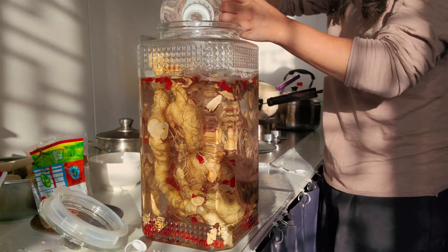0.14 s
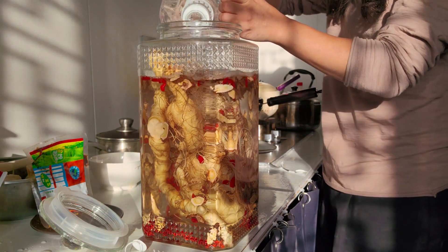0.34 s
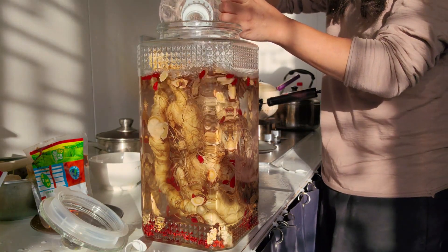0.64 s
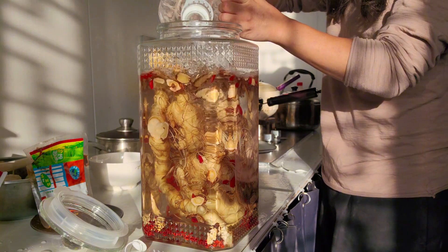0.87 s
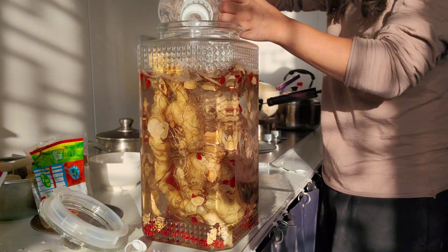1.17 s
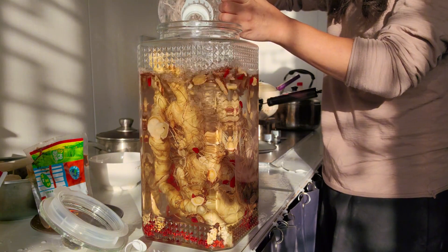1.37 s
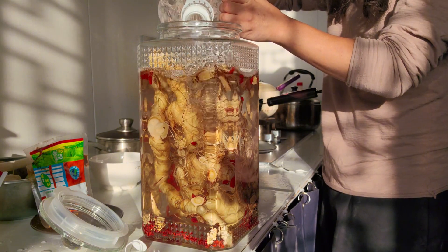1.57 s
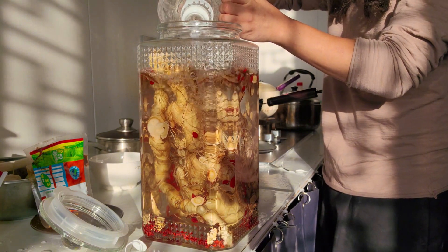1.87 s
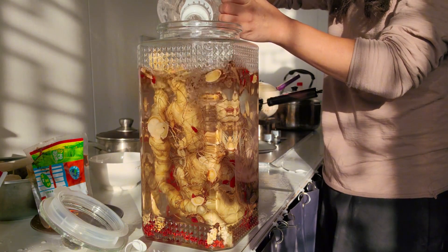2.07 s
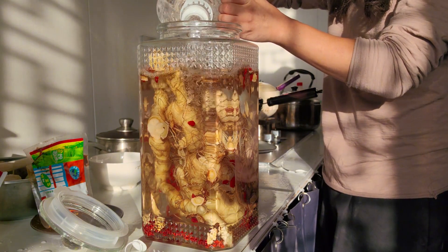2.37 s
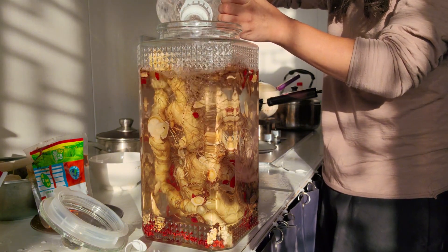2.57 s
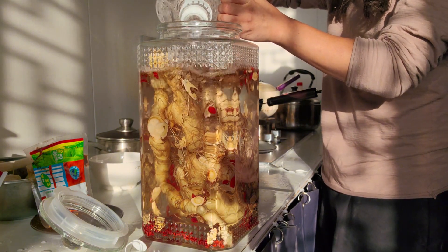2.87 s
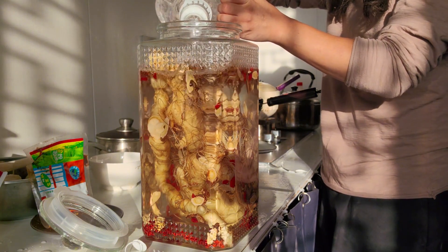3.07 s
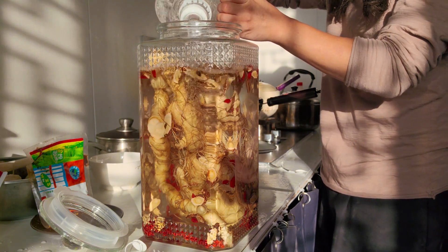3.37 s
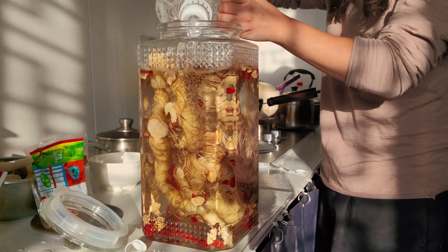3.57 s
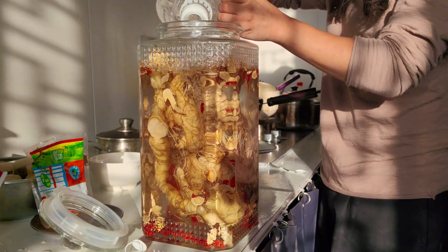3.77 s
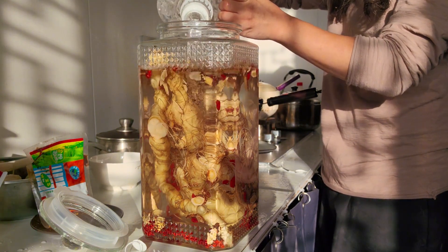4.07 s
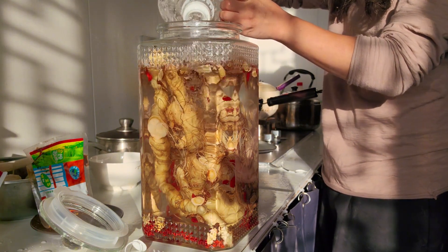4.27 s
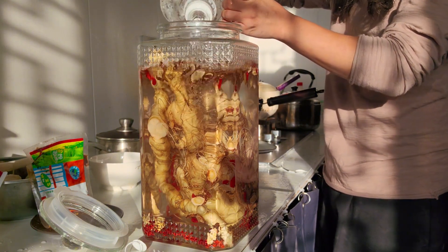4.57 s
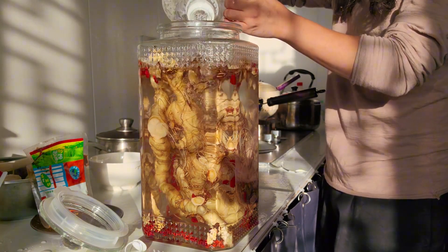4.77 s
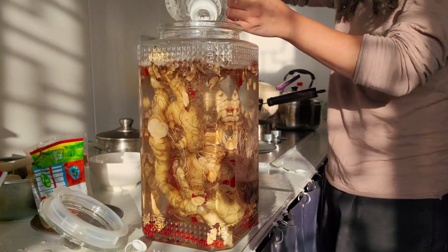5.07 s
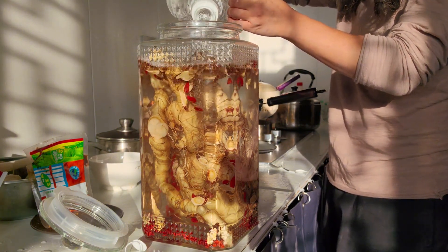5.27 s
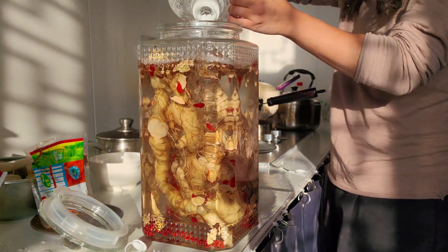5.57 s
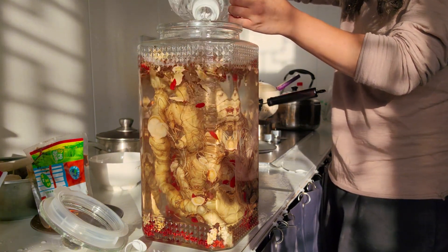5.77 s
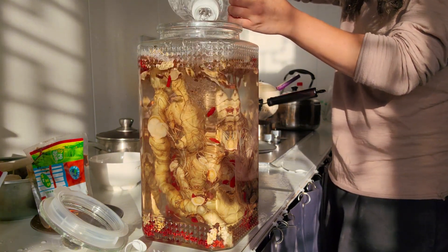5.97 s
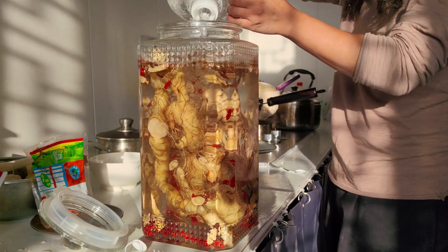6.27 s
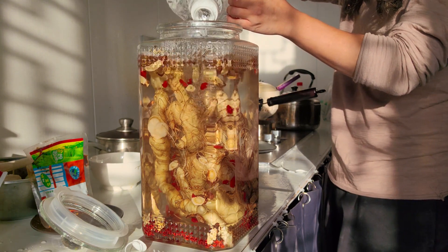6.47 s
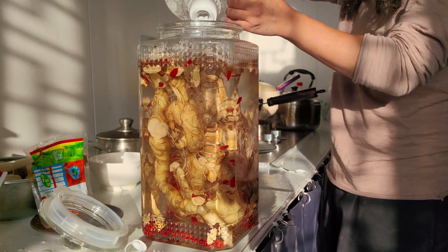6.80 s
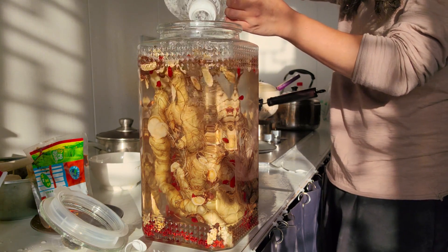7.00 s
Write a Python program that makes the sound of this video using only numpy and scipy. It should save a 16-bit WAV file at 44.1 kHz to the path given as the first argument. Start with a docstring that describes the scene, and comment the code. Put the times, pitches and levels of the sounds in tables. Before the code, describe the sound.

Liquid glugs from an upturned plastic jug into a nearly full glass jar, deep uneven gulps with fizzing splashes in a hard-walled kitchen.

```python
"""Deep liquid glugs: a plastic jug is upturned into a tall, nearly full glass jar in a hard-walled kitchen.
The stream arrives in surges, about four a second; air pockets large and small gulp as sliding sines.
Swarms of tiny damped sines make gurgle, fizz and spray; short noise bursts make slaps, spatters, low sloshes.
The air above the liquid, noise in narrow bands, rings a little higher as the jar fills.
A stereo microphone pair hears it with the room's echoes, over a quiet background of shaped noise."""
import sys
import numpy as np
from scipy import signal
from scipy.fft import rfft, irfft, next_fast_len
from scipy.io import wavfile
from scipy.ndimage import uniform_filter1d, map_coordinates

SR = 44100
rng = np.random.default_rng(int(sys.argv[2]) if len(sys.argv) > 2 else 0)


def bounce(signal):
    """Save signal as a 16-bit WAV file at the path given by the first command-line argument."""
    frames = np.transpose(np.atleast_2d(signal))
    limited = np.clip(frames, -1, 1)
    pcm = np.round(limited * 32767).astype(np.int16)
    wavfile.write(sys.argv[1], SR, pcm)


N = 314874  # length in samples


def amp(db):
    """Decibels to gain."""
    return 10 ** (np.asarray(db) / 20)


def unit(x):
    """Scale to rms 1."""
    return x / np.sqrt(np.mean(x ** 2) + 1e-20)


def along(points, hz):
    """Read (Hz, value) points on a log frequency axis."""
    f, value = np.transpose(points)
    return np.interp(np.log(hz + 1), np.log(f + 1), value)


def at_time(points, s):
    """Read (seconds, value) points at time s."""
    return np.interp(s, *np.transpose(points))


def wobble(rate):
    """A smooth random curve, rate knots a second."""
    knots = rng.standard_normal(int(N * rate / SR) + 4)
    return map_coordinates(knots, [np.arange(N) * rate / SR])


def filtered(x, response):
    """Shape x by a response given as a function of frequency."""
    n = x.shape[-1]
    m = next_fast_len(n + 8192)
    return irfft(rfft(x, m) * response(np.fft.rfftfreq(m, 1 / SR)), m)[..., :n]


def add(track, s, sound):
    """Mix a sound into the track at time s."""
    start = max(round(s * SR), 0)
    part = sound[..., :max(N - start, 0)]
    track[..., start:start + part.shape[-1]] += part


# How alike the two microphones hear diffuse sound.
# Each row: frequency in Hz, left-right correlation (no unit).
LEFT_RIGHT_LIKENESS = [(60, 0.8), (450, 0.76), (1200, 0.27), (2500, 0.37), (5000, -0.024), (9000, 0.52),
                       (15000, -0.01)]


def spread(pair):
    """Turn two unrelated signals into left and right: alike in the bass, more diffuse higher up."""
    def mid_and_side(hz):
        turn = np.arccos(np.clip(along(LEFT_RIGHT_LIKENESS, hz), -1, 1)) / 2
        return np.array([np.cos(turn), np.sin(turn)])
    mid, side = filtered(pair, mid_and_side)
    return np.array([mid + side, mid - side])


def coloured(pair, spectrum):
    """Stereo sound of rms 1, its sources weighted by the given spectrum."""
    return unit(spread(filtered(pair, lambda hz: amp(along(spectrum, hz)))))


# Tone of the kitchen's background.
# Each row: frequency in Hz, relative level in dB.
BACKGROUND_TONE = [(15, -46), (25, 2.5), (79, 4.5), (305, -22), (523, -14), (703, -19), (1020, -17),
                   (1750, -13.5), (1950, -14.5), (4150, -11.5), (6210, -10), (7910, -16), (15500, -19.5)]


def quiet_kitchen():
    """The place at rest: steady noise, strongest in the bass."""
    return amp(-66.5) * coloured(rng.standard_normal((2, N)), BACKGROUND_TONE)


# How long the kitchen rings on.
# Each row: frequency in Hz, time to fall 60 dB in seconds.
KITCHEN_DECAY = [(150, 0.053), (500, 0.44), (2000, 0.35), (6000, 0.31), (14000, 0.15)]


def in_room(sound, wet_db):
    """A short direct sound plus the kitchen's diffuse tail: fresh noise dying at its own rate in each band."""
    hz, t, z = signal.stft(rng.standard_normal((2, SR // 3)), SR, nperseg=256)
    decay = amp(-60 * t / along(KITCHEN_DECAY, hz)[:, None])
    tail = spread(signal.istft(z * decay, SR, nperseg=256)[1])
    tail = tail * np.clip(np.arange(tail.shape[1]) / SR / 0.002, 0, 1) ** 2  # builds up over 2 ms
    answer = amp(wet_db) * tail / np.linalg.norm(tail[0])
    answer[:, 0] += 1  # direct sound
    return signal.fftconvolve(sound[None], answer, axes=1)


def blended(pair, t60, wet_db):
    """The jar's glass walls throw each tiny ring back and forth, blurring the grains together."""
    t = np.arange(SR // 6) / SR
    answer = rng.standard_normal((2, len(t))) * amp(-60 * t / t60)
    answer = amp(wet_db) * answer / np.linalg.norm(answer[0])
    answer[:, 0] += 1  # direct sound
    return unit(signal.fftconvolve(pair, answer, axes=1)[:, :N])


def patchy(pair, depth_db, size):
    """Clouds of like-sized bubbles come and go: random swells, size bins wide and some 40 ms long."""
    z = signal.stft(pair, nperseg=512)[2]
    field = rng.standard_normal(z.shape[1:])
    for _ in range(2):
        field = uniform_filter1d(field, size=size, axis=0)
        field = uniform_filter1d(field, size=6, axis=1)
    return signal.istft(z * amp(depth_db * unit(field)), nperseg=512)[1][:, :N]


def swarm(count, lo_hz, hi_hz, cycles, scatter_db, size=256):
    """Two channels of small bubbles: damped sines of random strength, each rising in pitch at first."""
    when, pitch, strength, side = rng.random((count, 4)).T[:, :, None]
    hz = lo_hz * (hi_hz / lo_hz) ** pitch
    k = np.arange(size)
    age = k / SR * hz / cycles  # in decay times, each lasting this many cycles
    tone = np.sin(2 * np.pi * cycles * age * (1 + 0.036 * np.minimum(age, 2)))
    ring = tone * np.exp(-age) * (1 - k / size)
    ring = ring * amp(-scatter_db * np.log(np.maximum(1 - strength, .01)))
    at = ((when * N).astype(int) + k).ravel()
    channels = [ring * way(2 * np.pi * side) for way in (np.cos, np.sin)]
    return unit(np.array([np.bincount(at, channel.ravel(), N)[:N] for channel in channels]))


def pocket(hz, t60, attack, glide):
    """One body of air ringing, peak 1: a sine that swells, slides down in pitch and is choked."""
    t = np.arange(SR // 8) / SR
    pitch = hz * (1 + glide * (np.exp(-t / 0.0078) - np.exp(-1)))
    # choked ever faster, as a pocket is when it breaks the surface
    swell = (1 - np.exp(-(t / attack) ** 2)) * amp(-60 * (t / max(t60, .004)) ** 2.0)
    return np.sin(2 * np.pi * np.cumsum(pitch) / SR) * swell / swell.max()


def burst(hz, octaves, t60):
    """A brief wet crack, peak 1: dying noise in a band around one pitch."""
    t = np.arange(SR // 8) / SR
    noise = rng.standard_normal(len(t))
    band = filtered(noise, lambda f: 1 / (1 + (np.log2((f + 1) / hz) / octaves) ** 2))
    crack = band * amp(-60 * t / t60) * (1 - np.exp(-t * hz))
    return crack / np.abs(crack).max()


# Surges from the jug.
# Each row: start in seconds, length in seconds, then the base levels in dB of
# splash, spray, bubbling, gurgle and heave.
JUG_SURGES = [(0.116, 0.033, -65, -65, -59.5, -60, -67), (0.277, 0.052, -56.5, -60, -62, -87, -64),
              (0.481, 0.091, -59.5, -59, -64.5, -76, -63), (0.734, 0.048, -60, -63.5, -61, -71, -68.0),
              (0.957, 0.077, -58.5, -66, -67, -71, -69), (1.152, 0.12, -64, -68.5, -68.5, -66.5, -70),
              (1.457, 0.06, -64, -65.5, -67.5, -58.5, -68), (1.638, 0.09, -60, -65.5, -70, -63, -67.5),
              (1.88, 0.095, -62, -70, -64.5, -69, -71.5), (2.169, 0.031, -55, -61, -70, -62, -77),
              (2.297, 0.16, -63, -67, -110, -70.5, -78.5), (2.591, 0.089, -61, -66, -64.5, -64.5, -77.5),
              (2.835, 0.1, -61.5, -67.0, -76, -63.5, -70.5), (3.078, 0.12, -69, -64.5, -60, -62.5, -75.5),
              (3.317, 0.099, -65.5, -68.5, -65, -72, -83), (3.579, 0.079, -58.5, -63.5, -67.0, -69.5, -69),
              (3.789, 0.144, -62, -64.5, -68.5, -62, -74), (4.052, 0.1, -59, -56.5, -62.5, -63, -67.5),
              (4.28, 0.098, -58, -62.5, -75, -62.5, -68.5), (4.525, 0.1, -58.5, -64.5, -62.5, -68, -79),
              (4.791, 0.079, -56.5, -56, -64, -66.5, -71), (5.022, 0.086, -56.5, -63, -69.5, -59.5, -75),
              (5.236, 0.1, -57.5, -63, -75, -66, -66.5), (5.514, 0.059, -53, -56, -72, -60.5, -71.5),
              (5.765, 0.11, -58, -61, -86, -61, -86), (5.989, 0.072, -54.5, -59.5, -67.5, -60.5, -69.5),
              (6.223, 0.12, -62.5, -61, -63.5, -67.5, -69.5), (6.512, 0.061, -54, -59, -65, -60.5, -70),
              (6.716, 0.084, -57, -57, -66.5, -68, -67), (6.911, 0.16, -58.5, -65, -83, -64, -74)]


def surging(levels_db, lag_s, attack_s, swell_db, release_s, trickle_db):
    """Gain of a layer: surges rise, change by swell_db and die away over a steady trickle."""
    start, length = np.transpose(JUG_SURGES)[:2, :, None]
    t = np.arange(0, N, 64) / SR
    age = t - start - lag_s
    held = swell_db * (np.clip(age / length, 0, 1) - .5)
    # 20 dB of change per attack_s or release_s
    edges = np.maximum(-age, 0) / attack_s + np.maximum(age - length, 0) / release_s
    power = np.sum(amp(levels_db[:, None] + held - 20 * edges) ** 2, axis=0) + amp(trickle_db) ** 2
    return np.interp(np.arange(N) / SR, t, np.sqrt(power))


def stirred(share_db, attack_s, t60):
    """Gain of the motion that goes with each row of the glugs, dying away after it."""
    power, t = np.zeros(N), np.arange(SR // 2) / SR
    for s, db, *_ in POCKETS_AND_JAR_AIR:
        motion = amp(db + share_db - 60 * t / t60) * (1 - np.exp(-t / attack_s))
        add(power, s, motion ** 2)
    return np.sqrt(power)


def jar_air(pitch_hz, width_hz):
    """An air mode of the jar, stirred at random by the churning liquid."""
    stir = rng.standard_normal((2, 2, N))
    a, b = filtered(stir, lambda hz: 1 / (1 + 2j * hz / width_hz) ** 2)
    phase = 2 * np.pi * np.cumsum(pitch_hz) / SR
    return unit(spread(a * np.cos(phase) + b * np.sin(phase)))


# The air above the rising liquid.
# Each row: time in seconds, first air mode of the jar in Hz.
JAR_AIR_PITCH = [(0, 477.6), (7.14, 605.2)]
# Tone of the heaving liquid, of the gurgles and of the bubbling.
# Each row: frequency in Hz, relative level in dB.
HEAVE_TONE = [(25, -27), (52, -10.5), (70, 7), (84, -9), (98, 3), (118, -9.5), (146, 1), (205, -8),
              (300, -9), (420, -9), (650, -19), (1300, -53)]
GURGLE_TONE = [(350, -27), (650, 12), (1200, 2), (1600, 9), (3000, -20)]
BUBBLING_TONE = [(700, -7), (1450, -27), (1900, 3.5), (2300, 1), (2700, -1), (3300, 0), (4500, 15)]


def churn():
    """The plunging stream heaves the liquid, makes bubbles and keeps the jar's air ringing."""
    *_, bubbling_db, gurgle_db, heave_db = np.transpose(JUG_SURGES)
    air_hz = at_time(JAR_AIR_PITCH, np.arange(N) / SR)
    # liquid and first air mode, driven by the surges and by the glugs
    heaving = np.hypot(
        surging(heave_db, lag_s=0.033, attack_s=0.35, swell_db=10, release_s=0.14, trickle_db=-78),
        stirred(share_db=-26, attack_s=0.015, t60=0.38))
    ringing = np.hypot(
        surging(heave_db + 8, lag_s=0.069, attack_s=0.35, swell_db=-4.5, release_s=0.058, trickle_db=-85),
        stirred(share_db=-16.5, attack_s=0.005, t60=0.3))
    heave = heaving * coloured(rng.standard_normal((2, N)), HEAVE_TONE)
    first = ringing * jar_air(air_hz, width_hz=95)

    # gurgles and the upper air mode escape more freely as the surface nears the jar's mouth
    open_db = 20 * np.log2(air_hz / air_hz.mean())
    humming = surging(gurgle_db - 6, lag_s=-0.0072, attack_s=0.027, swell_db=-2, release_s=0.071,
                      trickle_db=-84.5)
    second = amp(open_db) * humming * jar_air(2.25 * air_hz, width_hz=85)
    gurgling = surging(gurgle_db, lag_s=-0.00061, attack_s=0.02, swell_db=5.5, release_s=0.082,
                       trickle_db=-77)
    gurgles = swarm(count=2200, lo_hz=612, hi_hz=1277, cycles=4.5, scatter_db=5.0, size=900)
    gurgles = blended(gurgles, t60=0.061, wet_db=-12)
    gurgle = amp(open_db - 2.0) * gurgling * coloured(gurgles, GURGLE_TONE)

    bubbling = surging(bubbling_db, lag_s=-0.0056, attack_s=0.048, swell_db=0.5, release_s=0.076,
                       trickle_db=-84)
    bubbles = swarm(count=3400, lo_hz=1509, hi_hz=3543, cycles=7.7, scatter_db=4.0, size=600)
    bubbles = patchy(blended(bubbles, t60=.25, wet_db=4), depth_db=2.3, size=4)
    bubbles = amp(5.0) * bubbling * coloured(bubbles, BUBBLING_TONE)
    leaning_left = amp([[1.0], [-1.0]])
    return (heave + first + second + gurgle) * leaning_left + bubbles


# Tone of the splash's fizz and of the finer spray.
# Each row: frequency in Hz, relative level in dB.
FIZZ_TONE = [(1290, -9), (2200, 4), (2550, -7), (3550, -4.5), (4410, -5), (6280, 3), (6700, 1.5),
             (7240, -4.5), (9000, -23), (11700, -25), (19800, -120)]
SPRAY_TONE = [(4120, -17), (7000, -16), (7570, -9.5), (12700, -6), (14700, -4), (15400, -1.5), (15800, -2)]


def splash():
    """Each surge throws up a dense fizz of tiny bubbles and a finer crackling spray."""
    splash_db, spray_db = np.transpose(JUG_SURGES)[2:4]
    fizzing = surging(splash_db, lag_s=0.0015, attack_s=.13, swell_db=1.5, release_s=0.13,
                      trickle_db=-79.5)
    spraying = surging(spray_db, lag_s=-0.0045, attack_s=0.1, swell_db=6.5, release_s=0.11,
                       trickle_db=-98)
    fizz = swarm(count=6000, lo_hz=2500, hi_hz=7500, cycles=13, scatter_db=3.6)
    mist = swarm(count=6000, lo_hz=6500, hi_hz=15000, cycles=6, scatter_db=3.6)
    fizz = patchy(blended(fizz, t60=.2, wet_db=3), depth_db=2.4, size=5)
    mist = patchy(blended(mist, t60=.15, wet_db=3), depth_db=2.6, size=8)
    # both levels flicker at random
    fizz = amp(0.1 + 2.4 * wobble(45)) * fizzing * coloured(fizz, FIZZ_TONE)
    mist = amp(0.96 + 0.8 * wobble(45)) * spraying * coloured(mist, SPRAY_TONE)
    return fizz + mist


# Low sloshes; the first row is the dying low tail of a sound from before the start.
# Each row: start in seconds, peak level in dB before the room, centre in Hz.
LOW_SLOSHES = [(0.004, -46.5, 218), (2.205, -49, 367), (3.596, -48, 168), (4.385, -56, 300),
               (5.546, -54, 156), (5.809, -51, 130)]


def sloshes():
    """Broad, dull low sounds, each a dying burst of low noise."""
    out = np.zeros((2, N))
    for s, db, hz in LOW_SLOSHES:
        add(out, s, in_room(amp(db) * burst(hz, octaves=1.0, t60=0.32), wet_db=-12.5))
    return out


# Sharp spatters.
# Each row: start in seconds, base level in dB, centre in Hz, width in octaves (0.1 at least is played).
SPATTERS = [(0.031, -40, 5700, 0.18), (0.119, -33, 2880, 1.1), (0.26, -49.5, 2060, 0.098),
            (0.567, -43.5, 1580, 0.081), (0.966, -39, 5760, 0.2), (1.029, -39, 1680, 0.2),
            (1.332, -47.5, 2565, 0.18), (1.483, -42, 6080, 0.21), (1.71, -43.5, 3080, 0.14),
            (1.927, -35, 6110, 0.2), (2.05, -42, 1570, 0.75), (2.183, -37.5, 6200, 0.091),
            (2.206, -37, 2000, 0.92), (2.447, -45, 3540, 0.18), (2.775, -43, 6100, 0.13),
            (3.158, -27, 14700, 0.33), (3.55, -40.5, 2640, 0.28), (3.885, -32.5, 10050, 0.73),
            (3.907, -38, 3280, 0.59), (4.114, -52, 2730, 0.23), (4.834, -31, 5400, 0.41),
            (5.113, -37, 5780, 0.35), (5.474, -44.5, 3680, 0.16), (5.603, -40, 14800, 0.26),
            (5.812, -32.5, 11650, 0.21), (5.950, -31, 6170, 0.071), (5.963, -33.5, 5670, 0.17),
            (6.773, -34.5, 5570, 0.26), (7.094, -37, 6200, 0.39)]


def spats():
    """Drops slap the surface: a sharp tick, a wet crack and a tiny ring, thrown up into the room."""
    out = np.zeros((2, N))
    onset = 1 - np.exp(-np.arange(SR // 8) / SR / 0.0028)
    for s, db, hz, octaves in SPATTERS:
        octaves = max(octaves, .1)
        crack = burst(hz, octaves, t60=0.038) * onset
        # the narrower the crack, the more of it is one clean bubble
        ping = .13 / octaves * pocket(hz, t60=.008, attack=.0012, glide=.05)
        tick = amp(-4) * burst(11000, octaves=1.2, t60=.005)
        add(out, s, in_room(amp(db - 3.0) * (crack + ping + tick), wet_db=0.5))
    return out


# Small bubbles that pop at the surface.
# Each row: start in seconds, base level in dB, pitch in Hz.
SURFACE_BUBBLES = [(0.54, -48, 1050), (2.308, -55.5, 1910), (2.642, -44.5, 1140), (2.845, -47, 1060),
                   (2.883, -57, 1190), (3.089, -45, 1902), (3.358, -52.5, 1215), (4.078, -54, 1250),
                   (4.573, -52, 1230), (5.04, -49.5, 1234), (5.178, -50.5, 900), (5.304, -52.5, 1215),
                   (5.533, -54, 1210), (5.784, -48, 1230), (6.035, -46.5, 1306), (6.276, -49, 1257),
                   (6.334, -49.5, 810), (6.528, -46.5, 1260)]


def plips():
    """Smaller bubbles ring briefly, break into froth and nudge the air in the jar."""
    out = np.zeros((2, N))
    for s, db, hz in SURFACE_BUBBLES:
        ring = pocket(hz, t60=.03, attack=.001, glide=.06)
        froth = 0.59 * burst(hz, octaves=0.17, t60=0.13)
        air = 0.58 * pocket(at_time(JAR_AIR_PITCH, s), t60=0.046, attack=0.0025, glide=0.047)
        add(out, s, in_room(amp(db - 0.5) * (ring + froth), wet_db=-4.5))
        add(out, s, amp(db - 9.0) * air)
    return out * amp([[.8], [-.8]])  # a little to the left


# Air pockets large and small; the weak, long rows are the jar's air ringing.
# Each row: time in seconds, base level in dB, pitch in Hz, time to fall 60 dB in seconds.
POCKETS_AND_JAR_AIR = [(0.033, -40, 475, 0.018), (0.125, -26.5, 446, 0.016), (0.215, -39.5, 442, 0.01),
                       (0.324, -42.5, 426, 0.047), (0.357, -43.5, 403, 0.06), (0.539, -44.5, 487, 0.096),
                       (0.573, -25.5, 442, 0.031), (0.7, -49.5, 485, 0.13), (0.802, -22, 445, 0.028),
                       (1.031, -28, 450, 0.026), (1.259, -37.5, 504, 0.031), (1.338, -44, 493.5, 0.049),
                       (1.49, -28, 462, 0.032), (1.711, -46, 540, .14), (1.961, -32.5, 508, 0.043),
                       (1.99, -42, 570, 0.055), (2.432, -41.5, 519, 0.028), (2.521, -46, 520, 0.026),
                       (2.771, -41, 514, 0.037), (2.855, -43.5, 564, 0.037), (2.93, -31.5, 451, 0.045),
                       (3.137, -46, 524, 0.018), (3.157, -38, 518, 0.042), (3.408, -52.5, 496, 0.031),
                       (3.776, -43.5, 507, 0.021), (3.886, -29, 494, 0.032), (3.938, -46, 550, .07),
                       (4.116, -37, 505, 0.026), (4.357, -42, 524, 0.027), (4.618, -41.5, 518, 0.032),
                       (4.699, -38, 496, 0.027), (4.834, -48, 545, .03), (4.867, -39.5, 484, 0.024),
                       (5.076, -30.5, 548, 0.019), (5.111, -24.5, 430, 0.032), (5.179, -39.5, 425, 0.028),
                       (5.795, -40, 510, 0.015), (5.849, -32.5, 451, .055), (5.912, -40.5, 470, 0.016),
                       (6.087, -40.5, 493, 0.032), (6.274, -44, 605, 0.066), (6.335, -47.5, 454, 0.064),
                       (6.377, -42.5, 477, 0.032), (6.599, -38.5, 518, 0.024), (6.806, -31.5, 511, 0.019),
                       (6.847, -32, 478, 0.024), (7.093, -44, 600, 0.0083)]
# Pockets open faster as the fall shortens.
# Each row: time in seconds, swell time in seconds.
POCKET_SWELL = [(0, .0034), (7.14, .0018)]
# Nearest echoes from the walls.
# Each row: delay in seconds, level in dB relative to the direct gulp.
WALL_ECHOES = [(.0115, -19.5), (.019, -15.5), (0.04, -26)]
# The kitchen's standing waves that the glugs set ringing.
# Each row: frequency in Hz, level in dB relative to the gulp, time to fall 60 dB in seconds.
STANDING_WAVES = [(345, -51, 0.55), (437, -27, 0.43), (610, -30, 0.24), (608, -41, 0.12)]


def glugs():
    """Air pockets and the jar's air ring as sliding sines, with a slap, a thump and wall echoes."""
    out, t = np.zeros((2, N)), np.arange(SR // 3) / SR
    for s, db, hz, t60 in POCKETS_AND_JAR_AIR:
        attack = at_time(POCKET_SWELL, s)
        start = s - attack * 2 / 3  # the ring takes a moment to swell
        gulp = amp(db) * pocket(hz, t60, attack, glide=0.16)
        thump = amp(db - 21.5) * burst(130, octaves=1.0, t60=0.063)
        slap = amp(db - 18) * burst(2700, octaves=2.2, t60=0.0083)
        add(out, start, in_room(gulp + thump, wet_db=-9.0))
        add(out, start, in_room(slap, wet_db=7.5))
        for delay, echo_db in WALL_ECHOES:
            add(out, start + delay, amp(echo_db) * gulp)
        for wave_hz, wave_db, wave_t60 in STANDING_WAVES:
            wave = np.sin(2 * np.pi * (wave_hz * t + rng.random())) * (1 - np.exp(-t / 0.016))
            add(out, start, amp(db + wave_db - 60 * t / wave_t60) * wave)
    return out * amp([[1.1], [-1.1]])  # a little to the left


def scene():
    """The pour over the kitchen's quiet background."""
    return quiet_kitchen() + churn() + splash() + sloshes() + spats() + plips() + glugs()


def record(dry):
    """The left microphone hears everything slightly earlier; deep rumble and the top treble are cut."""
    lead = 1.6e-5  # s, early on the left and late on the right
    low_cut_hz, top_hz = 32, 15800

    def microphones(hz):
        low_cut = 1 / np.sqrt(1 + (low_cut_hz / (hz + 1)) ** 6)
        shift = np.exp(2j * np.pi * hz * lead * np.array([[1], [-1]]))
        return (hz < top_hz) * low_cut * shift
    return filtered(dry, microphones)


dry = scene()
out = record(dry)
bounce(out)
```